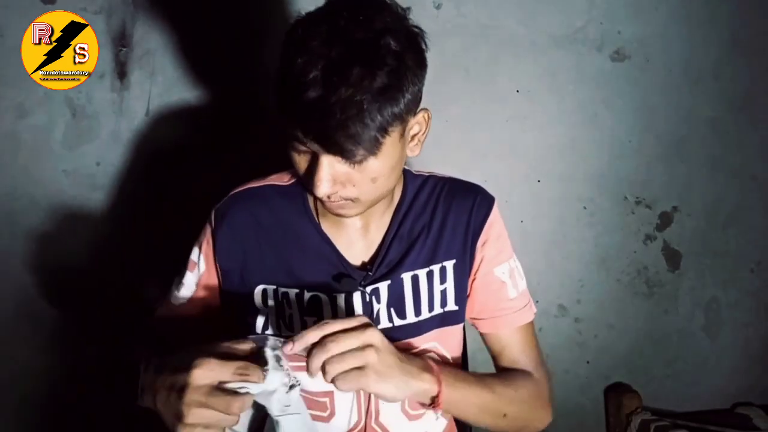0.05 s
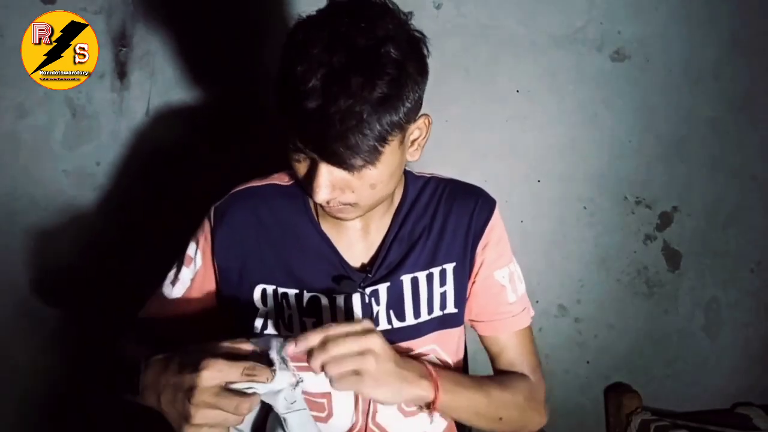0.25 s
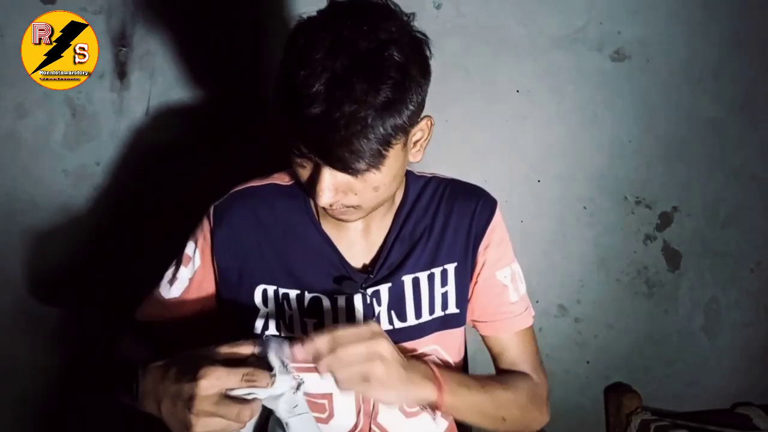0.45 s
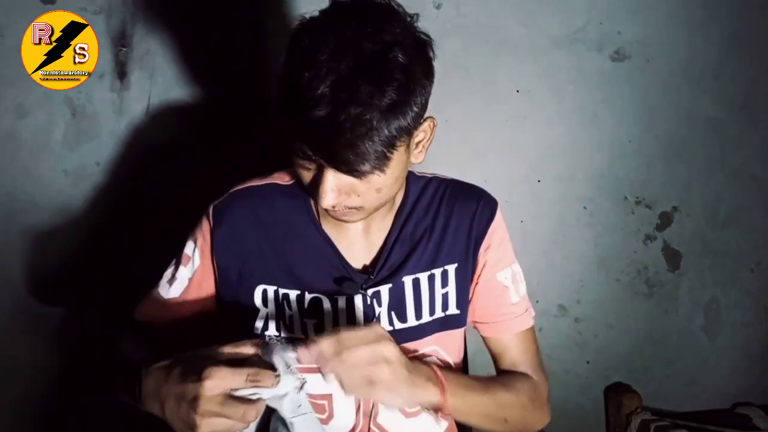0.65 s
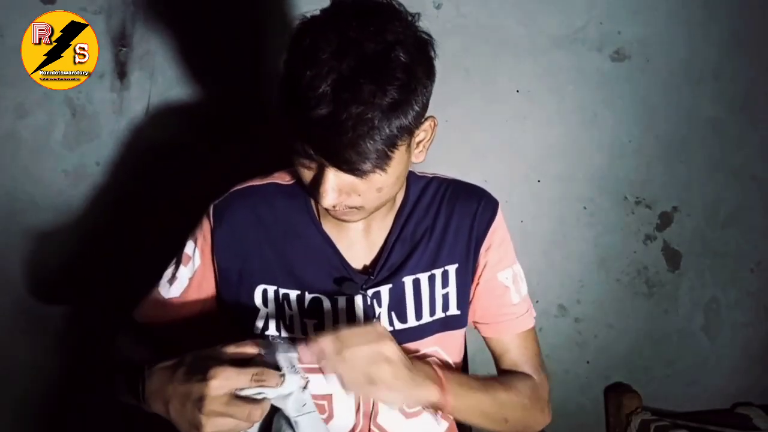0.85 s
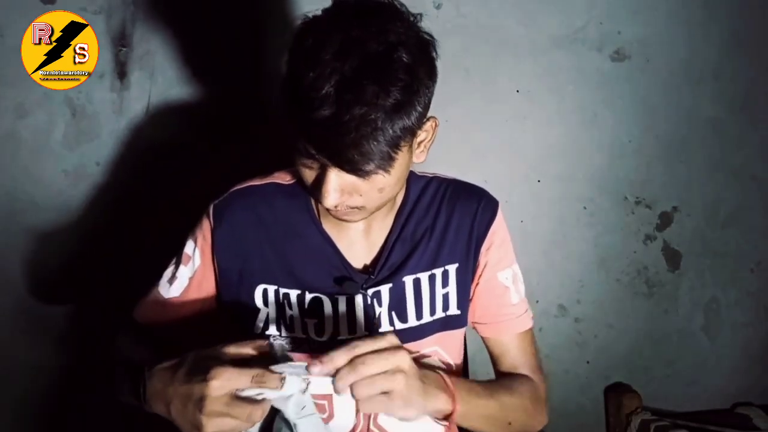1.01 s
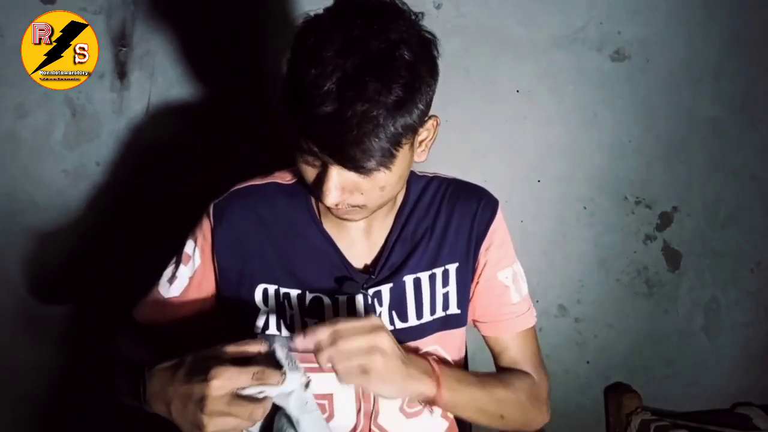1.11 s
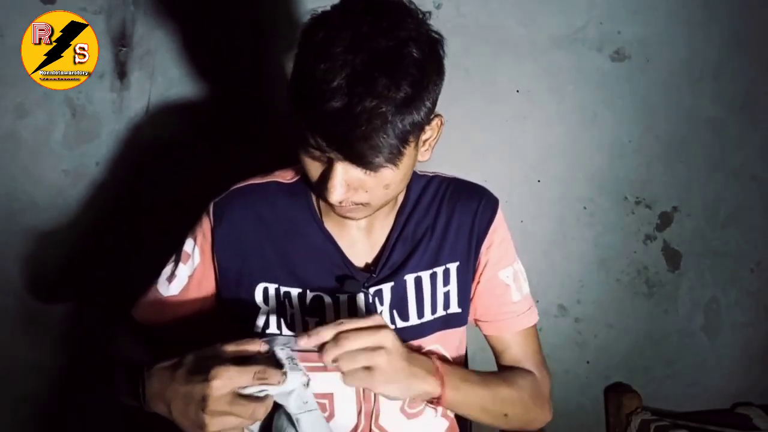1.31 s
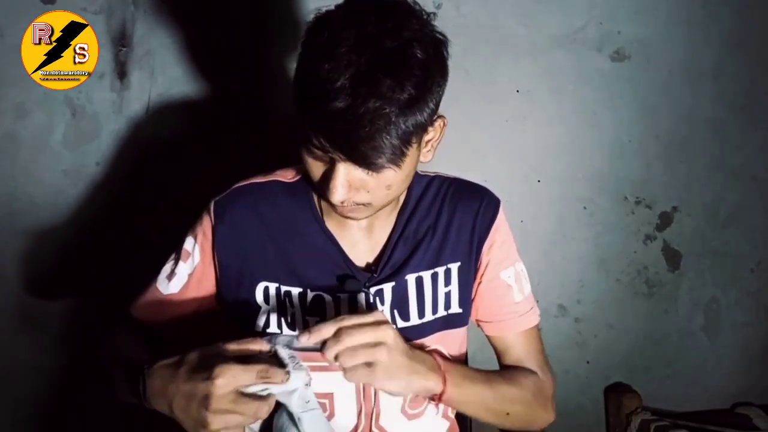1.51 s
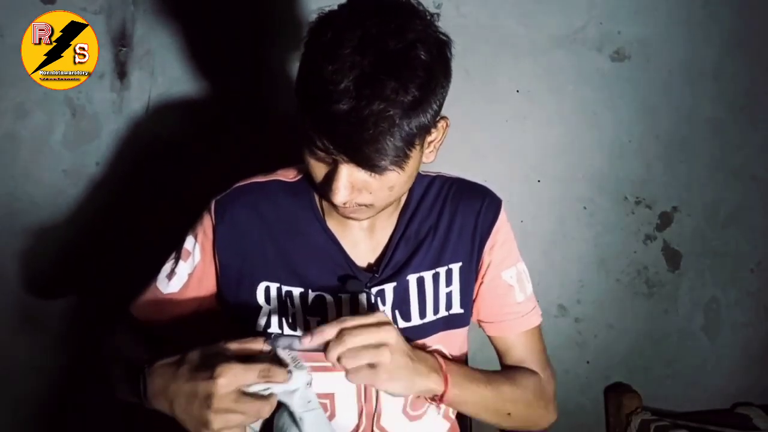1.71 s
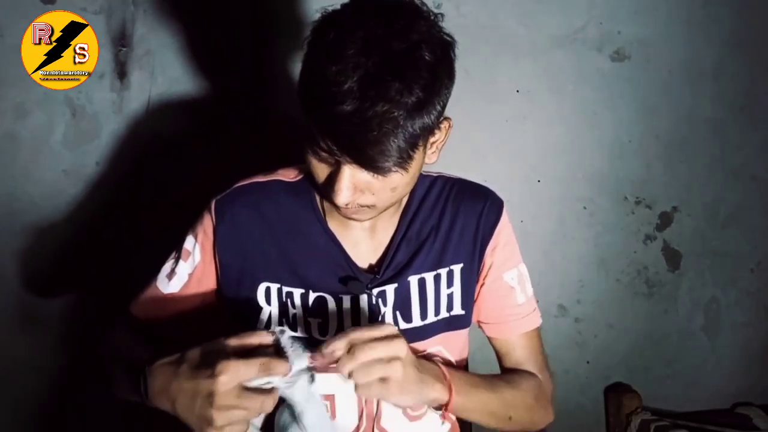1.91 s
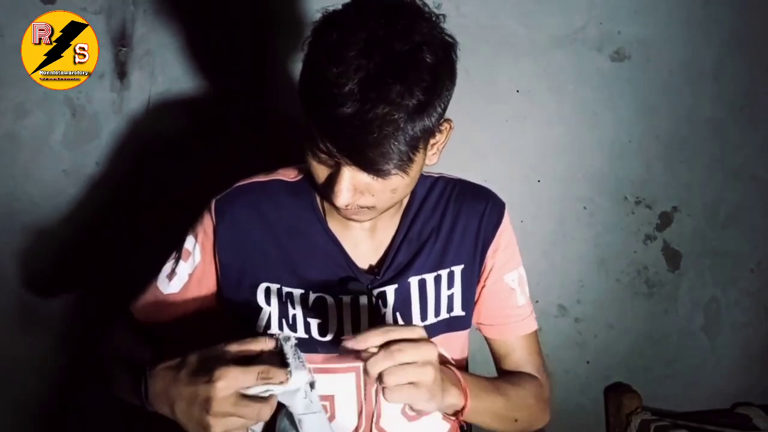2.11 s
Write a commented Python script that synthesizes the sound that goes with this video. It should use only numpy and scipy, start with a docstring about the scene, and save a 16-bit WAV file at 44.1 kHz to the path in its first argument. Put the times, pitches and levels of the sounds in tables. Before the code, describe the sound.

Quick dry rasping strokes of a blade on thick denim cloth in a small quiet room.

```python
"""Dry, quick back-and-forth scrapes: a knife blade over a bunched fold of denim, close to a clip-on
microphone in a small room. Pushes bite at once and snap over the threads; returns open with a scuff and
swell more gently. Trains of thread and fibre slips ring the blade, filtered noise gives the cloth's hollow
falling note and its flapping. At the end the hand stops with a soft bump and a soft touch dies away.
A faint room and a quiet noise floor surround the strokes."""
import sys
import numpy as np
from scipy import signal
from scipy.fft import rfft, irfft, next_fast_len
from scipy.io import wavfile
from scipy.ndimage import uniform_filter1d

SR = 44100
rng = np.random.default_rng(int(sys.argv[2]) if len(sys.argv) > 2 else 0)


def waveform_to_disk(signal):
    """Save audio, clipped to [-1, 1], as 16-bit WAV at the path in sys.argv[1]."""
    frames = np.transpose(np.atleast_2d(signal))
    scaled = np.clip(frames, -1, 1) * 32767
    samples = np.round(scaled).astype(np.int16)
    wavfile.write(sys.argv[1], SR, samples)


N = 94815

# Hard strokes: (start [s], length [s], rasp [dB], thread snaps over the rasp [dB], tilt [dB/octave],
#   pressure gained along the stroke [dB], deepest bite [s], extra level of the bite [dB],
#   cloth note at mid-stroke [Hz], note level [dB], flapping level [dB])
PUSH_STROKES = [(.235, 0.071, -30.5, -4.5, -1.03, 2, .264, 2, 700, -42.5, -45.5),
                (.453, 0.068, -32, -7, 0, 3, .468, 5.5, 700, -41.5, -48),
                (.669, 0.074, -32.5, -1, 0.35, -2.5, .688, 2.5, 643, -39, -44.5),
                (.873, .062, -28, -1, 1.06, -3, .896, 3, 735, -37.5, -41.5),
                (1.079, .066, -31.5, -3, 0, 2, 1.087, 5, 607, -37, -46.5),
                (1.294, 0.068, -31.5, -2.5, -0.54, 0, 1.300, 3.5, 640, -41, -49),
                (1.500, 0.065, -30.5, -3, -0.1, 0, 1.509, 0.5, 650, -35, -59.5),
                (1.706, 0.066, -33, -1.5, 0.1, -3, 1.727, 1, 670, -37.5, -47)]
# Course of a push: (share of the length [1], rasp [dB], cloth note [dB], flapping [dB])
PUSH_COURSE = [(-.05, -32, -39.5, -40.5), (.01, -16, -22, -27), (.05, -6.5, -16.5, -19.5),
               (.11, -0.5, -12, -18), (.44, -1, -2.5, -5), (.62, -7, -7, -9), (.88, -11, -3, -3),
               (1.08, -28.5, -19.5, -5), (1.5, -52.5, -32.5, -29)]


def pushes():
    """Hard strokes whose rasp jumps up at once while the cloth's note follows later."""
    return scraping(PUSH_STROKES, PUSH_COURSE, fall_oct=0.84, snaps_per_s=340)


# Return strokes: (start [s], length [s], rasp [dB], thread snaps over the rasp [dB], tilt [dB/octave],
#   pressure gained along the stroke [dB], deepest bite [s], extra level of the bite [dB],
#   cloth note at mid-stroke [Hz], note level [dB], flapping level [dB])
RETURN_STROKES = [(0.14, 0.044, -42, 0.5, -0.35, -3.5, .171, 2, 855, -54, -58),
                  (0.362, 0.062, -42, 0, -0.18, -9.5, .392, 3, 490, -43, -61),
                  (0.567, .069, -38, -7.5, -0.03, 0, .610, 5.2, 600, -44.5, -62),
                  (0.782, 0.058, -35, -9, -0.29, 2, .815, 5, 980, -46.5, -61),
                  (0.974, 0.073, -33, -4, 0.24, -3, 1.015, 3, 750, -42, -49),
                  (1.190, 0.068, -33, -2.5, 0.58, 2, 1.224, 1.5, 793, -40.5, -50),
                  (1.401, 0.065, -34, -7.5, -0.42, 0.5, 1.409, 2.6, 805, -40.5, -51.5),
                  (1.610, .064, -35, -7, -0.45, 0.5, 1.622, 3.4, 890, -42, -47.5),
                  (1.814, 0.067, -33, -5.5, .3, 1.5, 1.841, 2.3, 720, -38, -49.5)]
# Course of a return: (share of the length [1], rasp [dB], cloth note [dB], flapping [dB])
RETURN_COURSE = [(-.1, -37, -35, -29), (.08, -10.5, -9.5, -17), (.3, -5.5, -10.5, -8),
                 (.55, 0.5, -1.5, -14), (.78, -3.5, -3.5, -8), (.95, -9, -5, -4), (1.1, -34.5, -19.5, -11),
                 (1.5, -53, -33, -13)]


def returns():
    """Strokes back, which swell more gently and whose note falls further."""
    return scraping(RETURN_STROKES, RETURN_COURSE, fall_oct=1.14, snaps_per_s=480)


BITE_WIDTH_S = 0.0075
TILT_PIVOT_HZ = 6000
FIBRE_DB = -2  # hiss over the stroke's rasp level
# Loose cloth flapping: (frequency [Hz], level [dB])
FLAP_COLOUR = [(30, -21.5), (70, -9), (120, 0.5), (220, 2), (330, 4), (600, -13.5), (1500, -48)]


def scraping(strokes, course, fall_oct, snaps_per_s):
    """Strokes one way: slips ring the blade, the fold sounds its falling note, loose cloth flaps."""
    t = np.arange(N) / SR
    share, *courses = np.transpose(course)
    threads, fibres = thread_snaps(snaps_per_s), fibre_hiss()
    rasp, note_gain, flap_gain = np.zeros(N), np.zeros(N), np.zeros(N)
    centre_hz = np.ones(N)
    for (start, length, rasp_db, snap_db, tilt_db, lean_db,
         bite_s, bite_db, note_hz, note_db, flap_db) in strokes:
        progress = (t - start) / length
        on = (progress > share[0]) & (progress < share[-1])
        past_middle = np.clip(progress[on], 0, 1) - .5
        bite = bite_db * np.exp(-((t[on] - bite_s) / BITE_WIDTH_S) ** 2)
        pressure_db = lean_db * past_middle + bite
        rasp_course, note_course, flap_course = [
            np.interp(progress[on], share, c) + pressure_db for c in courses]

        slips = amp(snap_db) * threads[on] + amp(FIBRE_DB) * fibres[on]
        grit = amp(rasp_db + rasp_course) * slips

        def tilt_and_echoes(hz):
            tilt = amp(tilt_db * np.log2((hz + 1) / TILT_PIVOT_HZ))
            return tilt * nearby_echoes(hz, count=6)

        rasp[on] += filtered(grit, tilt_and_echoes)
        note_gain[on] += amp(note_db + note_course)
        flap_gain[on] += amp(flap_db + flap_course)
        centre_hz[on] = note_hz * 2 ** (-fall_oct * past_middle)
    return blade_ring(rasp) + note_gain * cloth_note(centre_hz) + flap_gain * noise(FLAP_COLOUR)


# Colour of the blade's rasp: (frequency [Hz], level [dB])
RASP_COLOUR = [(150, -53), (450, -3), (1000, -1), (1450, -7), (1900, -12), (2450, -7), (3000, -10.5),
               (3330, -15), (3750, -7), (4450, -2.5), (4850, -4), (5850, 3.5), (6200, -0.5), (6600, 1),
               (7300, -6.5), (8200, -2), (9000, -5), (9800, -10), (11000, -9.5), (11600, -13), (12700, -22),
               (14100, -24), (14900, -13), (15550, -32)]


def thread_snaps(snaps_per_s):
    """The edge catches on thread after thread: sparse clicks, all of one sign."""
    return coloured(catches(snaps_per_s, scatter_db=3, unevenness=.4), RASP_COLOUR)


def fibre_hiss():
    """Dense fibre slips of random sign; the colour of their hiss varies in brief random patches."""
    slips = catches(8000, scatter_db=3.5, unevenness=.9)
    return patchy(coloured(slips * rng.choice([-1, 1], N), RASP_COLOUR), depth_db=3)


# Blade resonances: (frequency [Hz], width [Hz], level over the plain rasp [dB])
BLADE_MODES = [(2457, 10, -7), (4320, 130, -14.5), (5885, 20, -15.5), (6530, 170, -11.5), (6830, 70, -6.5),
               (8860, 230, -8), (9950, 55, -13.5), (11150, 50, -2)]


def blade_ring(rasp):
    """The rasp itself plus the damped modes it excites in the blade."""
    def response(f):
        return 1 + sum(amp(db) * resonance(f, hz, width) for hz, width, db in BLADE_MODES)
    return filtered(rasp, response)


def cloth_note(centre_hz):
    """A broad noisy resonance with a moving centre, cross-faded between fixed bands."""
    half_width_oct = 0.45  # where a band's weight is halved
    out, power = np.zeros(N), np.full(N, 1e-9)
    for octave in np.arange(7.5, 12, .25):  # log2 of the band centre in Hz
        def quarter_octave(hz):
            return abs(np.log2(hz + 1) - octave) < 1 / 8
        band = unit(filtered(rng.standard_normal(N), quarter_octave))
        weight = 1 / (1 + ((octave - np.log2(centre_hz)) / half_width_oct) ** 2)
        out, power = out + weight * band, power + weight ** 2
    return out / np.sqrt(power)


ECHO_MIN_S, ECHO_MAX_S, ECHO_DB = 0.00031, .004, -16.5


def nearby_echoes(hz, count):
    """Reflections off hands and chest, redrawn per stroke; expected power is unchanged."""
    delays, signs = rng.uniform(ECHO_MIN_S, ECHO_MAX_S, count), rng.choice([-1, 1], count)
    gain = amp(ECHO_DB)
    echoes = signs @ np.exp(-2j * np.pi * np.outer(delays, hz))
    return (1 + gain * echoes) / np.sqrt(1 + count * gain ** 2)


SCUFF_DB, SCUFF_AFTER_S, SCUFF_WIDTH_S = -15.5, 0.0064, 0.0068  # level over the stroke's rasp level
SCUFF_HZ, SCUFF_FALL_OCT_PER_S = 1710, 130


def scuffs():
    """A dull scuff of falling resonant noise opens every return stroke."""
    t = np.arange(N) / SR
    gain, centre_hz = np.zeros(N), np.full(N, float(SCUFF_HZ))
    for start, _, rasp_db, *_ in RETURN_STROKES:
        peak_s = start + SCUFF_AFTER_S
        since = t - peak_s
        on = abs(since) < .03
        gain += swell(peak_s, rasp_db + SCUFF_DB, SCUFF_WIDTH_S)
        centre_hz[on] = SCUFF_HZ * 2 ** (-SCUFF_FALL_OCT_PER_S * since[on])
    return gain * cloth_note(centre_hz)


# Dull bumps of the hand on the cloth: (time [s], frequency [Hz], level [dB], half width [s])
HAND_BUMPS = [(0.7, 224, -36, 0.0044), (1.9803, 156.3, -35.5, 0.0033)]


def bumps():
    """The hand thuds on the cloth: short sine bursts that swell and die around their time."""
    t = np.arange(N) / SR
    return sum(amp(db) * np.sin(2 * np.pi * hz * (t - s)) / (1 + ((t - s) / width) ** 2)
               for s, hz, db, width in HAND_BUMPS)


# Light brush of the blade: (frequency [Hz], level [dB])
BRUSH_COLOUR = [(200, -39), (1200, -18.5), (3200, -30), (4200, -8), (5100, -16), (6500, 0.5), (7400, -11),
                (8300, -4.5), (10500, -13), (12500, -19), (15500, -28)]


def blade_brushes():
    """Two short noise swells: the blade is laid on the cloth, then brushes it as the hand stops."""
    set_down = swell(0.1296, -60.5, 0.0096)
    stop = swell(1.9795, -44, 0.0037)
    return (set_down + stop) * noise(BRUSH_COLOUR)


# Soft touches on the cloth: (time [s], level [dB], time to fall 60 dB [s])
SOFT_TOUCHES = [(.11, -62.5, 0.57), (2.001, -53, 0.097)]
# Colour of a touch: (frequency [Hz], level [dB])
TOUCH_COLOUR = [(100, 2), (300, -9), (550, 2.5), (1000, -3.5), (1400, -16.5), (3000, -62), (5800, -13),
                (9000, -41), (15000, -29.5)]


def touches():
    """Soft noise that starts at once and decays exponentially, before the first stroke and after the last."""
    t = np.arange(N) / SR
    gain = sum(amp(db - 60 * abs(t - s) / decay) * (t > s) for s, db, decay in SOFT_TOUCHES)
    return gain * noise(TOUCH_COLOUR)


# Hands shifting the cloth: (time [s], level [dB], width to 1/e [s])
CLOTH_SHIFTS = [(1.869, -53, 0.033), (1.988, -55, 0.034)]
# Low rumble of a shift: (frequency [Hz], level [dB])
RUMBLE_COLOUR = [(25, -15.5), (55, -14), (115, 7), (200, -14), (400, -13), (1200, -51)]


def shifts():
    """The moving cloth rumbles: low noise in bell-shaped swells."""
    return sum(swell(*row) for row in CLOTH_SHIFTS) * noise(RUMBLE_COLOUR)


ROOM_DB = -22
ROOM_MODE_HZ, ROOM_MODE_WIDTH_HZ, ROOM_MODE_DB = 116.5, 14, -1.5
# Room decay: (frequency [Hz], time to fall 60 dB [s])
ROOM_DECAY = [(120, 0.37), (700, 0.48), (2700, 0.64), (6000, 0.23), (15000, 0.12)]


def room(x):
    """A faint diffuse tail of decaying noise and one low standing wave."""
    hz, t, z = signal.stft(rng.standard_normal(SR // 2), SR, nperseg=256)
    decay = amp(-60 * t / along(ROOM_DECAY, hz)[:, None])
    tail = signal.istft(z * decay, SR, nperseg=256)[1]
    wet = signal.fftconvolve(x, tail / np.linalg.norm(tail))[:N]
    boom = filtered(x, lambda f: resonance(f, ROOM_MODE_HZ, ROOM_MODE_WIDTH_HZ))
    return amp(ROOM_DB) * wet + amp(ROOM_MODE_DB) * boom


# Colour of the background: (frequency [Hz], level [dB])
FLOOR_COLOUR = [(20, -19.5), (60, 1), (130, -5.5), (470, -11.5), (800, -14), (1570, -26), (2800, -26),
                (4000, -21.5), (7000, -25.5), (12500, -28), (15500, -37)]


def noise_floor():
    """A steady, quiet coloured noise under everything."""
    return amp(-71) * noise(FLOOR_COLOUR)


def amp(db):
    """Decibels to gain."""
    return 10 ** (np.asarray(db) / 20)


def unit(x):
    """Scale to rms 1."""
    return x / np.sqrt(np.mean(x ** 2) + 1e-20)


def along(points, hz):
    """Read (frequency [Hz], value) points on a log frequency axis."""
    f, v = np.transpose(points)
    return np.interp(np.log(hz + 1), np.log(f + 1), v)


def filtered(x, response):
    """Apply a response given as a function of frequency."""
    m = 2 * next_fast_len(len(x))
    return irfft(rfft(x, m) * response(np.fft.rfftfreq(m, 1 / SR)), m)[:len(x)]


def coloured(x, spectrum):
    """Causal colouring by (frequency [Hz], level [dB]) points, at rms 1."""
    def response(hz):
        cepstrum = irfft(np.log(amp(along(spectrum, hz))))
        cepstrum[len(cepstrum) // 2:] = 0  # keeping one side makes the filter minimum phase
        return np.exp(2 * rfft(cepstrum))
    return unit(filtered(x, response))


def noise(spectrum):
    """Coloured noise of rms 1."""
    return coloured(rng.standard_normal(N), spectrum)


def catches(rate, scatter_db, unevenness):
    """A train of tiny slips at uneven intervals and of uneven size; rate is per second."""
    draws = rng.standard_normal((20000, 2))
    gaps = np.exp(unevenness * draws[:, 0])
    at = (np.cumsum(gaps / gaps.mean()) * SR / rate).astype(int)
    size = amp(scatter_db * np.clip(draws[:, 1], -2, 2))
    return np.bincount(at[at < N], size[at < N], N)


def patchy(x, depth_db):
    """Give a sound brief random patches of colour."""
    z = signal.stft(x, nperseg=256)[2]
    field = uniform_filter1d(rng.standard_normal(z.shape), size=5, axis=0)  # smooth over frequency
    field = uniform_filter1d(field, size=4, axis=1)  # and over time
    return unit(signal.istft(z * amp(depth_db * unit(field)), nperseg=256)[1][:N])


def resonance(f, hz, width_hz):
    """Response of one damped mode, 1 at its peak."""
    return 1j * f * width_hz / (hz ** 2 - f ** 2 + 1j * f * width_hz)


def swell(s, db, width_s):
    """A brief bell-shaped gain around time s, down to 1/e at width_s."""
    return amp(db) * np.exp(-((np.arange(N) / SR - s) / width_s) ** 2)


def scene():
    """Strokes and handling in the room, over a quiet floor."""
    strokes = pushes() + returns() + scuffs()
    handling = bumps() + blade_brushes() + touches() + shifts()
    close = strokes + handling
    return (close + room(close) + noise_floor())[None]


def record(dry):
    """Nothing is kept above the band limit."""
    return filtered(dry[0], lambda hz: hz < 15560)[None]


dry = scene()
out = record(dry)
waveform_to_disk(out)
```